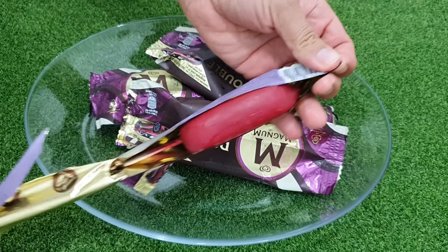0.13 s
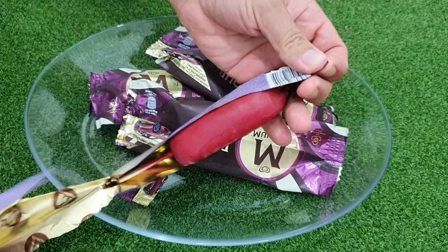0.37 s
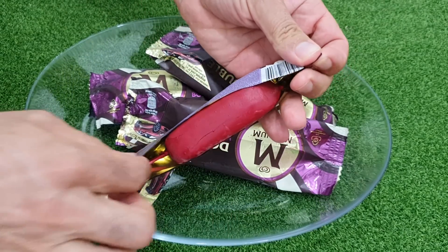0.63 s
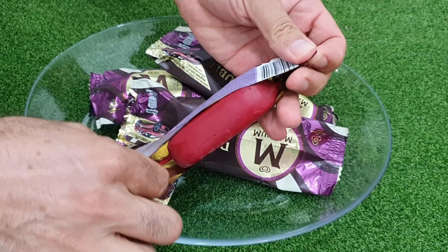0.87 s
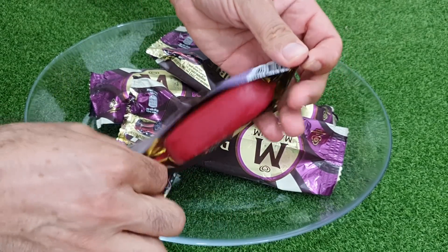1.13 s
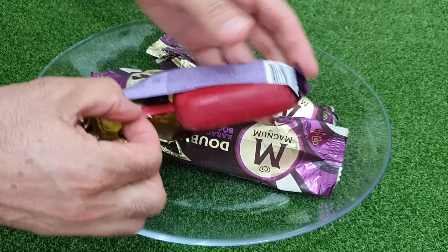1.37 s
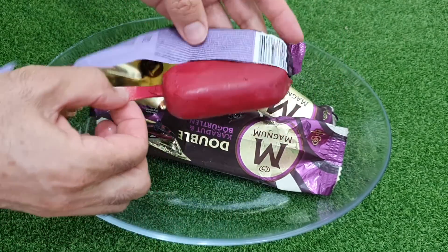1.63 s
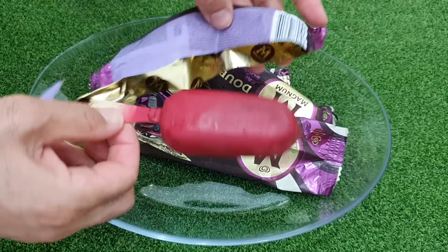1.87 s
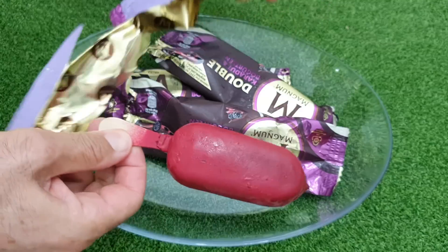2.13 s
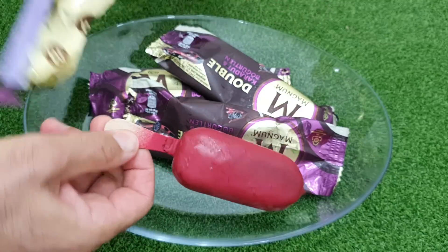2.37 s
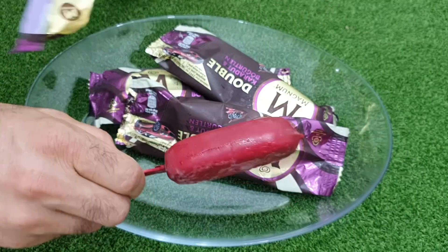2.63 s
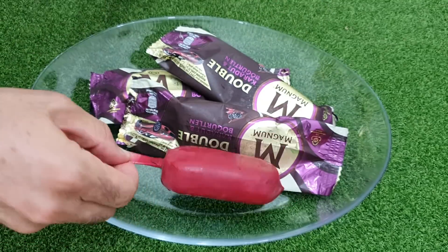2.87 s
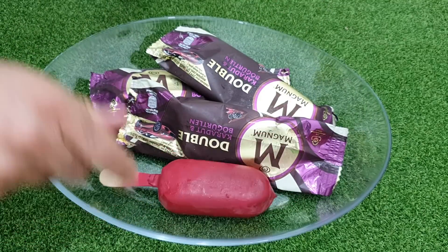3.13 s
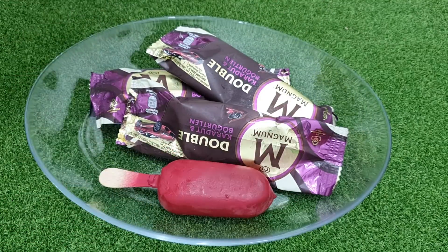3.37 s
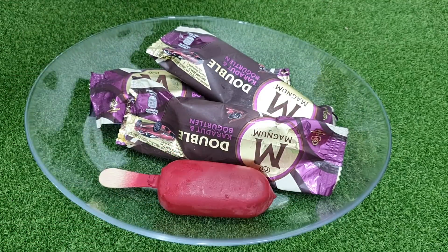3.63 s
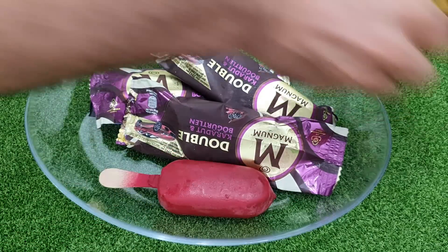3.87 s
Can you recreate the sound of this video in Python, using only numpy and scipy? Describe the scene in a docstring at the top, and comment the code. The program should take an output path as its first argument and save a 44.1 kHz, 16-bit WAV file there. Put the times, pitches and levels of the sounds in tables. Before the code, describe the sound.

Foil wrapper crackles sharply as it is pulled off, plate clinks softly, then loud crumpling

```python
"""A foil wrapper is pulled off an ice cream bar and crumpled; the bar is set down on a glass plate.
Foil: single snaps and thousands of small buckles, all coloured noise bursts, over a rustle and hollow resonances.
Plate: contact pulses drive decaying modes, with noise cracks at the contacts. Hands: a low noise rumble.
A hard room rings on as decaying noise; behind it lie air hiss and a faint appliance drone of narrow noise bands."""
import sys
import numpy as np
from scipy import signal
from scipy.fft import rfft, irfft
from scipy.io import wavfile

SR = 44100
rng = np.random.default_rng(int(sys.argv[2]) if len(sys.argv) > 2 else 0)


def unload_wav(signal):
    """Save mono or channel-first audio to the path in sys.argv[1] as 16-bit WAV at rate SR, clipped to [-1, 1]."""
    wavfile.write(
        sys.argv[1],
        SR,
        np.round(np.clip(np.atleast_2d(signal).T, -1, 1) * 32767).astype(np.int16),
    )


def volts_from_decibels(level):
    """Turn decibel levels (scalar or array-like) into linear amplitude factors."""
    exponent = np.asarray(level, float) / 20
    return 10 ** exponent


N = 176400
T = np.arange(N) / SR
BIN_HZ = np.arange(N // 2 + 1) * SR / N

# handling of the foil: start_s, level_db (relative), tilt_db_per_octave (before a +-6 limit)
HANDLING = [(0, -22, 3.5), (.05, -25, 2.1), (.12, -33, -0.8), (.2, -31, 3), (.3, -32, -0.5),
            (.36, -43.5, 6.5), (0.448, -53.5, -0.5), (.66, -55, -2.5), (.72, -57, -10), (.78, -36.5, 0),
            (.88, -32.5, 1.5), (1.0, -40.5, 0), (1.12, -29, 2.5), (1.2, -33.5, 1.3), (1.33, -25.5, 2.2),
            (1.4, -39.5, 0.3), (1.53, -43, -1.5), (1.58, -30.5, -1), (1.686, -28.5, 3), (1.77, -51, 3),
            (1.85, -58, -4), (1.9, -44.5, 1), (2.0, -63.5, -2.5), (2.101, -46.5, 0), (2.369, -64, -2),
            (2.41, -55, -2.5), (2.6, -57.5, -3.5), (2.75, -55, -1.5), (2.909, -66.5, -6.5),
            (2.94, -44.5, 4.5), (2.973, -29.5, -2), (3.06, -31, -1), (3.15, -40.5, -4), (3.27, -52.5, -2.5),
            (3.311, -39.5, -1), (3.45, -33, 2), (3.491, -17.5, 2.5), (3.62, -21, 2.5), (3.75, -29, 2.2),
            (3.852, -31.5, 3), (3.939, -46.5, -4), (4, -31.5, 4.5)]
LAG_S = 0.0001  # right side hears bursts later
BURST_RISE_S = 0.0001


def on_log(table, hz):
    """Read (Hz, value) points on a log frequency axis."""
    table = np.array(table, float)
    return np.interp(np.log(np.maximum(hz, 1)), np.log(table[:, 0]), table[:, 1])


def unit(x):
    """Scale to rms 1."""
    return x / np.sqrt(np.mean(x ** 2))


def pair(size, own=0.9):
    """Left and right noise: alike in the bass, increasingly independent in the treble."""
    alike_hz = 910
    mid, side = rfft(rng.standard_normal((2,) + size))
    hz = np.arange(mid.shape[-1]) * SR / size[-1]
    share = own * hz / np.hypot(hz, alike_hz)
    left_right = np.array([mid + share * side, mid - share * side])
    return irfft(left_right / np.sqrt(1 + share ** 2), size[-1])


def shaped_noise(table):
    """Two-sided noise with the spectrum of (Hz, dB per Hz) points."""
    return irfft(rfft(pair((N,))) * volts_from_decibels(on_log(table, BIN_HZ)), N)


def resonances(x, table):
    """Noise through narrow peaks (Hz, width Hz, rms dB), whose levels waver as narrow-band noise does."""
    spec = rfft(x)
    total = 0
    for centre_hz, width_hz, db in table:
        peak = irfft(spec / (1 + 2j * (BIN_HZ - centre_hz) / width_hz), N)
        total = total + volts_from_decibels(db) * unit(peak)
    return total


def place(times_s, bursts, pan_db):
    """Add two-sided bursts at their times, panned (positive = left), the right side a little late."""
    out = np.zeros((2, N + 2048))
    for side, sign in enumerate((1, -1)):
        start = ((times_s + side * LAG_S) * SR).astype(int)
        at = start[:, None] + np.arange(bursts.shape[-1])
        panned = bursts[side] * volts_from_decibels(sign * pan_db / 2)[:, None]
        out[side] = np.bincount(at.ravel(), panned.ravel(), N + 2048)
    return out[:, :N]


def buckles(pitch_hz, fall_s, octaves, wide_db, treble_db, body_db, size):
    """Decaying noise bursts: a band round the pitch, a wide skirt, a treble edge, a low body; onset at size / 8."""
    t = np.arange(size) / SR
    hz = np.maximum(np.arange(size // 2 + 1), 0.5) * SR / size
    envelope = (1 - np.exp(-t / BURST_RISE_S)) * np.exp(-t / fall_s[:, None])
    burst = pair((len(pitch_hz), size), 0.9) * envelope
    band = np.exp(-0.5 * (np.log2(hz / pitch_hz[:, None]) / octaves * 2) ** 2)
    skirt = volts_from_decibels(wide_db) / (1 + (2600 / hz) ** 4) / (1 + (hz / 7000) ** 4)
    edge = volts_from_decibels(treble_db)[:, None] / (1 + (7000 / hz) ** 4)
    body = volts_from_decibels(body_db)[:, None] / (1 + (350 / hz) ** 2) / (1 + (hz / 1800) ** 4)
    spec = rfft(np.roll(burst, size // 8, axis=-1))
    size_of_bins = np.abs(spec)
    even = spec / (size_of_bins + 0.15 * size_of_bins.mean(axis=-1, keepdims=True))  # flattens chance peaks
    onset = np.clip((t - t[size // 8]) / BURST_RISE_S + 1, 0, 1)
    return irfft(even * (band + skirt + edge + body), size) * onset


def air():
    """Room air as shaped hiss, plus the wavering lines of an appliance."""
    # hiss spectrum: freq_hz, relative_db_per_hz
    hiss_spectrum = [(18, -59), (30, 2), (239, -5), (461, -18), (499, -5), (889, -8.5), (1160, -5),
                     (1350, -24), (1860, -9), (9500, -21), (13000, -50)]
    # appliance lines: freq_hz, width_hz, rms_db
    drone_lines = [(246.8, 13.5, -57.5), (489, 36, -62.5), (654, 4.2, -69.5), (1182, 5.9, -70)]
    hiss_db = -58.5
    hiss = unit(shaped_noise(hiss_spectrum))
    return volts_from_decibels(hiss_db) * hiss + resonances(pair((N,)), drone_lines)


def room(x):
    """Diffuse tail: noise that dies band by band, convolved with the source."""
    # decay time by frequency: freq_hz, t60_s
    decay_t60 = [(100, 1), (500, 0.83), (2000, 0.61), (5000, 0.52), (10000, 0.44), (16000, 0.033)]
    rise_s, length = 0.00086, 2 * SR
    f, t, z = signal.stft(pair((length,)), SR, nperseg=256)
    decay = 1000. ** (-t / on_log(decay_t60, f)[:, None])
    tail = signal.istft(z * decay, SR, nperseg=256)[1][:, :length]
    tail = tail * (1 - np.exp(-T[:length] / rise_s))
    tail = tail / np.sqrt((tail ** 2).sum(axis=1).mean())
    return signal.fftconvolve(x[None], tail, axes=1)[:, :N]


def hands():
    """A low rumble of the hands: a noise band that follows the handling."""
    # rumble band: freq_hz, width_hz, db (re handling level)
    rumble_band = [(114, 120, -25)]
    start_s, level_db, _ = np.array(HANDLING, float).T
    return resonances(pair((N,)), rumble_band) * volts_from_decibels(np.interp(T, start_s, level_db))


def plate():
    """Contacts push smoothly into the plate's modes (longer: fewer high modes) and crack, short ones loudest."""
    # plate modes: freq_hz, relative_db, t60_s
    modes = [(104, -22, 0.17), (109.6, -8.5, 0.55), (121.5, -5, 2.28), (158, -12, 1.37), (174.8, -23, 1.6),
             (201, -28, 1), (226.6, -16, 1.6), (310, -22, 0.075), (399.5, -15, 0.17), (470, -19, 0.59),
             (674, -10.5, 0.081), (1043, -6, 0.53), (2005, 2, 0.036), (2714, -3, 0.039)]
    # bar meets plate: start_s, relative_db, contact_ms (pulses get 3 samples more)
    contacts = [(2.946, -31, 10.5), (2.965, -26.5, 0.074), (2.973, -33.5, 0.16), (3.016, -27, 0.83),
                (3.036, -21, 0.28), (3.046, -20, 0.32), (3.055, -24, 6.7), (3.079, -34.5, 0.21),
                (3.126, -47, 1.9)]
    crack_hz, crack_fall_s, crack_db = 3060, 0.0015, 13.5
    push = np.zeros(N)
    for s, db, ms in contacts:
        pulse = np.hanning(int(ms * SR / 1000) + 3)
        start = int(s * SR)
        push[start:start + len(pulse)] += volts_from_decibels(db) * pulse / pulse.sum()
    ring = 0
    for f, db, t60 in modes:
        ring = ring + volts_from_decibels(db) * np.sin(2 * np.pi * f * T) * 1000. ** (-T / t60)

    start_s, level_db, contact_ms = np.array(contacts, float).T
    same = np.ones(len(start_s))
    cracks = buckles(crack_hz * same, crack_fall_s * same, 1.6, -5, -10 * same, -8 * same, size=1024)
    cracks = cracks / np.abs(cracks).max(axis=2).mean(axis=0)[:, None]
    hardness = (0.097 / contact_ms) ** 1.55
    cracks = cracks * (volts_from_decibels(level_db + crack_db) * hardness)[:, None]
    return signal.fftconvolve(push, ring)[:N] + place(start_s - 128 / SR, cracks, 0 * same)


def hollow():
    """The crumpled wrapper's air pockets resonate while it is squeezed."""
    # pocket resonances: freq_hz, width_hz, relative_db
    pockets = [(368, 18, 0), (465, 30, -3), (590, 40, -5), (800, 70, -3)]
    # squeeze: start_s, level_db
    squeeze = [(3.3, -68), (3.47, -43), (3.51, -46.5), (3.76, -35.5), (3.912, -65), (3.928, -72),
               (4.0, -39.5)]
    start_s, level_db = np.array(squeeze, float).T
    return unit(resonances(pair((N,)), pockets)) * volts_from_decibels(np.interp(T, start_s, level_db, left=-120))


def crackle(count=8000):
    """Thousands of small buckles of scattered pitch and size, over a rustle; both follow the handling."""
    # foil spectrum: freq_hz, relative_db_per_hz
    foil_spectrum = [(60, -35), (113, -18), (270, -5), (400, 6), (800, -1.5), (3040, 2), (9500, -19),
                     (15000, -9), (16500, -68)]
    grain_cycles, grain_octaves, grain_pan_db = 1.65, 1.2, 1
    scatter_db, scatter_top_db = 4.5, 12
    grains_db, rustle_db = -3, -16  # re handling level
    when, where, chance, side = rng.random((count, 4)).T
    times_s = when * N / SR
    hz = 150 * (15000 / 150) ** where
    flat = np.ones(count)
    bursts = buckles(hz, grain_cycles / hz, grain_octaves, -42, -40 * flat, -50 * flat, size=512)
    bursts = bursts / np.sqrt((bursts ** 2).sum(axis=2).mean(axis=0))[:, None]
    scatter = np.minimum(-scatter_db * np.log(1 - chance), scatter_top_db)
    size_db = on_log(foil_spectrum, hz) + 10 * np.log10(hz) + scatter  # 10 log hz: pitches are log-spread
    grains = unit(place(times_s, bursts * volts_from_decibels(size_db)[:, None], grain_pan_db * (2 * side - 1)))
    rustle = unit(shaped_noise(foil_spectrum))

    start_s, level_db, tilt = np.array(HANDLING, float).T
    f, t, z = signal.stft(volts_from_decibels(grains_db) * grains + volts_from_decibels(rustle_db) * rustle, SR, nperseg=256)
    octaves = np.log2(np.maximum(f, 150) / 3000)[:, None]
    tilt_db = np.interp(t, start_s, np.clip(tilt, -6, 6)) * octaves
    gain = volts_from_decibels(np.interp(t, start_s, level_db) + tilt_db)
    return signal.istft(z * gain, SR, nperseg=256)[1][:, :N]


def snaps():
    """Single loud creases as foil facets flip; low ones are longer, hollower pops."""
    # creases, levels before the trims below: start_s, peak_db, pitch_hz, body_db, treble_db
    creases = [(0.024, -10, 5670, -22, -13), (0.03, -9, 6260, -26, -15), (0.04, -8, 5920, -25, -19),
               (0.087, -16, 1890, -17, -19), (0.134, -13, 3910, -23, -13), (0.167, -4, 3750, -31, -17),
               (0.222, -6, 8930, -35, -13), (0.23, -11, 4820, -30, -11), (0.241, -4, 4130, -33, -16),
               (0.304, -9, 2940, -29, -15), (0.395, -19, 2850, -28, -18), (0.605, -35, 993, -11, -20),
               (0.698, -30, 1290, -17, -18), (0.74, -14, 1670, -26, -17), (0.817, -17, 1260, -16, -18),
               (0.834, -17, 2890, -24, -20), (0.88, -14, 1280, -15, -16), (0.899, -22, 3580, -19, -17),
               (0.963, -21, 4250, -21, -18), (1.02, -22, 643, -11, -18), (1.04, -22, 778, -14, -7),
               (1.077, -13, 6010, -23, -15), (1.117, -18, 4040, -21, -13), (1.131, -20, 3330, -18, -7),
               (1.162, -7, 8840, -28, -14), (1.166, -13, 6040, -21, -16), (1.174, -16, 748, -18, -17),
               (1.247, -14, 923, -11, -25), (1.267, -19, 1030, -15, -14), (1.286, -12, 5660, -23, -22),
               (1.293, -18, 3900, -19, -15), (1.302, -13, 3510, -17, -8), (1.323, -5, 9430, -24, -14),
               (1.34, -15, 5620, -17, -13), (1.362, -15, 1570, -17, -16), (1.37, -11, 3460, -21, -18),
               (1.46, -19, 1180, -17, -19), (1.496, -18, 2930, -19, -28), (1.551, -8, 3110, -24, -22),
               (1.592, -10, 2310, -21, -18), (1.629, -14, 665, -20, -15), (1.87, -28, 2860, -19, -20),
               (1.884, -26, 692, -21, -10), (1.9, -25, 3250, -26, -10), (2.035, -27, 2930, -24, -18),
               (2.087, -34, 1360, -13, -16), (2.397, -40, 832, -15, -20), (3.294, -32, 697, -10, -19),
               (3.312, -31, 2900, -12, -18), (3.357, -15, 2150, -24, -14), (3.405, -21, 1210, -12, -16),
               (3.432, -22, 1130, -12, -11), (3.466, -18, 5160, -18, -15), (3.473, -15, 4680, -16, -12),
               (3.482, -10, 3260, -15, -13), (3.521, -6, 3090, -22, -14), (3.561, -12, 3270, -16, -13),
               (3.579, -10, 2760, -13, -15), (3.589, -10, 929, -13, -15), (3.616, -7, 2770, -21, -23),
               (3.627, -9, 3510, -20, -21), (3.644, -14, 2900, -15, -17), (3.681, -14, 3310, -17, -16),
               (3.775, -16, 3470, -18, -15), (3.824, -18, 3890, -18, -13), (3.978, -15, 9140, -25, -14)]
    peak_trim_db, body_trim_db, treble_trim_db, skirt_db = -1.5, 14, 5.5, -1
    fall_s, fall_cycles = 0.00074, 1.4  # decay time is fall_s plus fall_cycles periods
    width_octaves, pop_narrowing = 0.65, 0.75  # width at 3 kHz, exponent over pitch
    pop_below_hz, pop_db_per_octave = 1800, 18
    pan_spread_db = 2
    start_s, peak_db, hz, body_db, treble_db = np.array(creases, float).T
    octaves_below = np.clip(np.log2(pop_below_hz / hz), 0, 1)
    pop_db = pop_db_per_octave * octaves_below * np.clip((body_db + 24) / 8, 0, 1)  # band stands out more
    bursts = buckles(hz, fall_s + fall_cycles / hz,
                     width_octaves * (hz[:, None] / 3000) ** pop_narrowing,
                     skirt_db - pop_db[:, None],
                     treble_db + treble_trim_db - pop_db,
                     body_db + body_trim_db - pop_db, size=1024)
    both = (bursts[0] + np.roll(bursts[1], int(LAG_S * SR), axis=-1)) / 2
    bursts = bursts / np.abs(both).max(axis=1)[:, None] * volts_from_decibels(peak_db + peak_trim_db)[:, None]
    pan_db = pan_spread_db * rng.standard_normal(len(start_s))
    return place(np.maximum(start_s - 128 / SR, 0), bursts, pan_db)


def scene():
    """Foil, plate and hands, a room tail of foil and plate, the air."""
    foil_room_db, plate_room_db = -6, -13
    foil = snaps() + crackle() + hollow()
    glass = plate()
    room_send = volts_from_decibels(foil_room_db) * foil[0] + volts_from_decibels(plate_room_db) * glass[0]  # left side feeds the room
    return foil + glass + hands() + room(room_send) + air()


def top_cut(x):
    """Nothing passes above the cut-off."""
    return signal.sosfilt(signal.butter(12, 16810, fs=SR, output="sos"), x)


def record(dry):
    """Microphones drop the deepest bass, round the highest peaks and drop the top."""
    low_hz, top_hz, ceiling = 76.4, 15700, 1.5
    mic = signal.sosfilt(signal.butter(3, low_hz, "high", fs=SR, output="sos"), dry)
    rounded = ceiling * np.tanh(mic / ceiling)
    mix = signal.sosfilt(signal.butter(6, top_hz, fs=SR, output="sos"), rounded)
    return top_cut(mix)


dry = scene()
out = record(dry)
unload_wav(out)
```